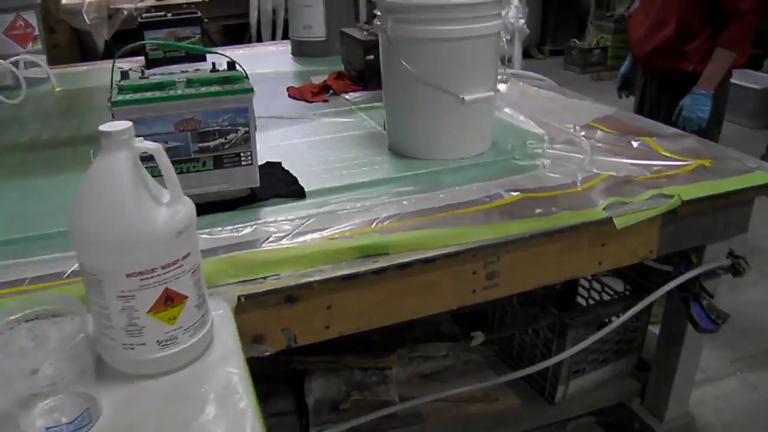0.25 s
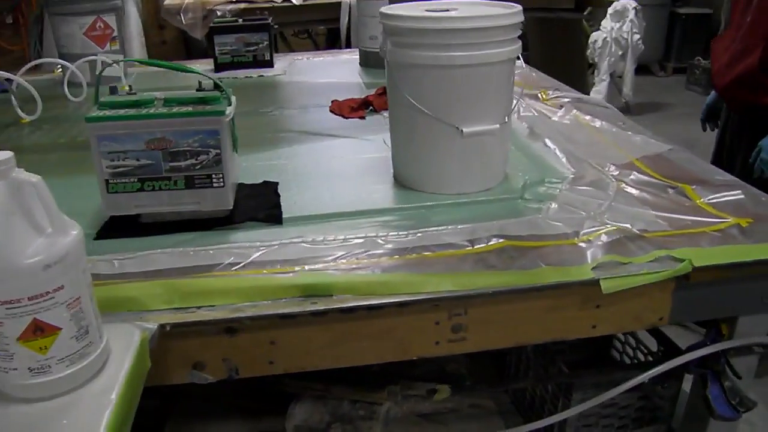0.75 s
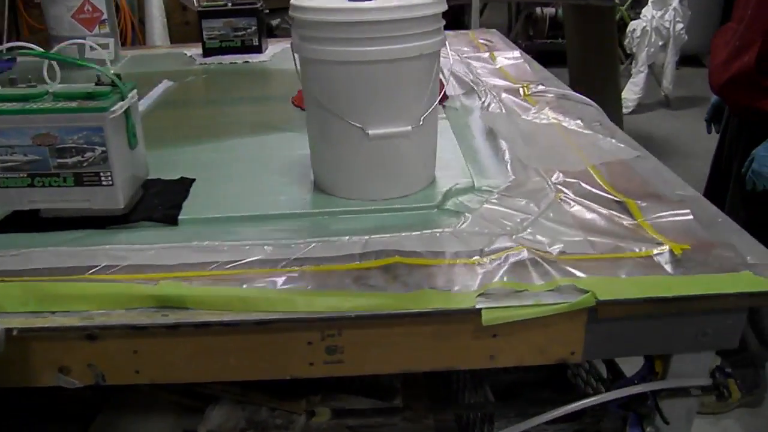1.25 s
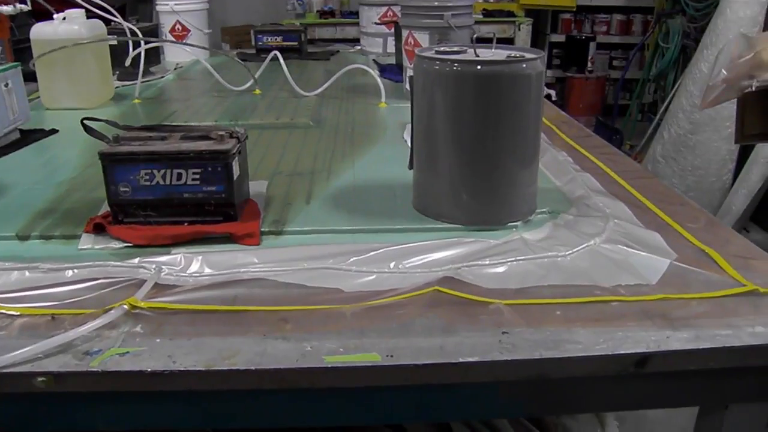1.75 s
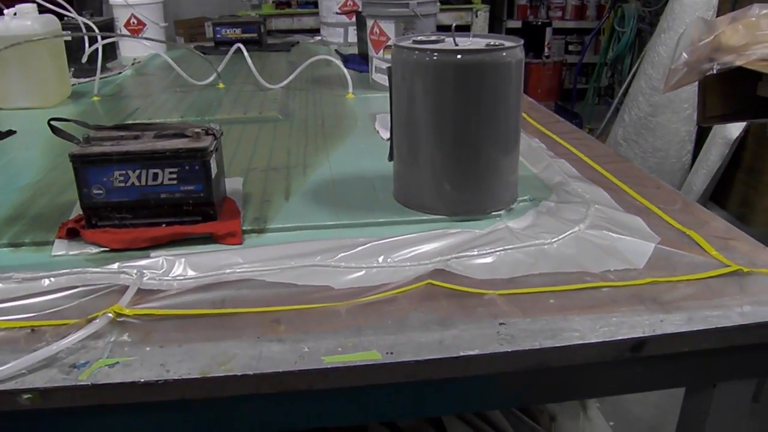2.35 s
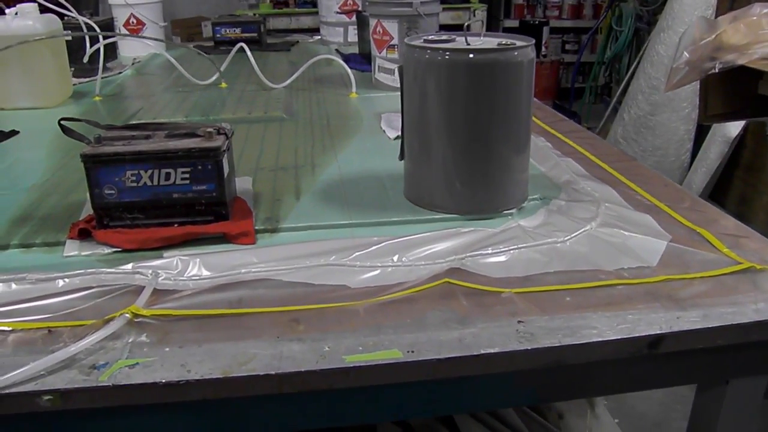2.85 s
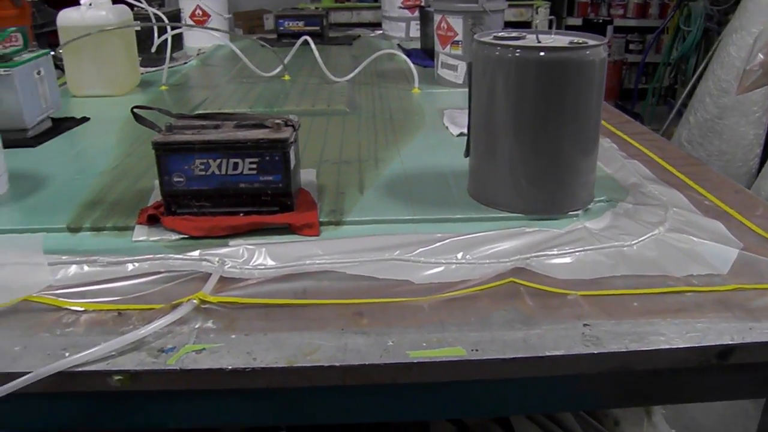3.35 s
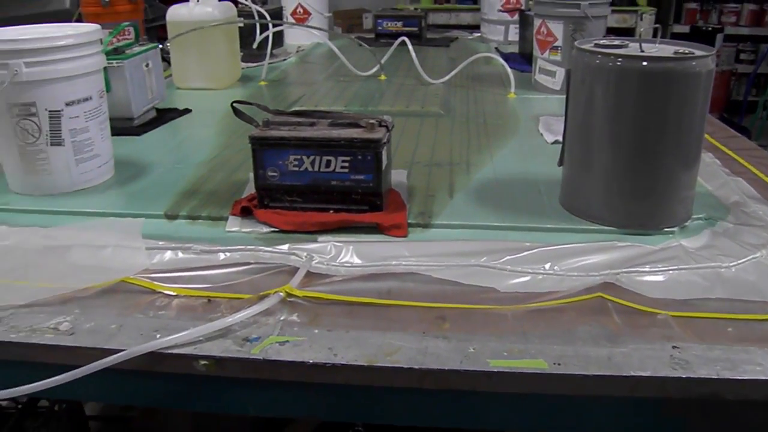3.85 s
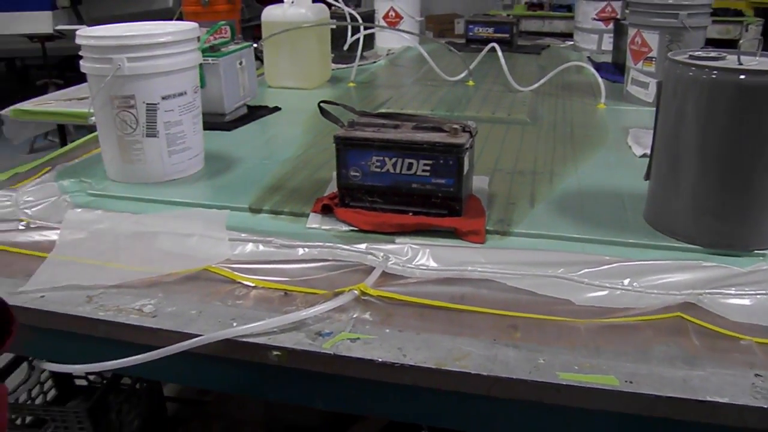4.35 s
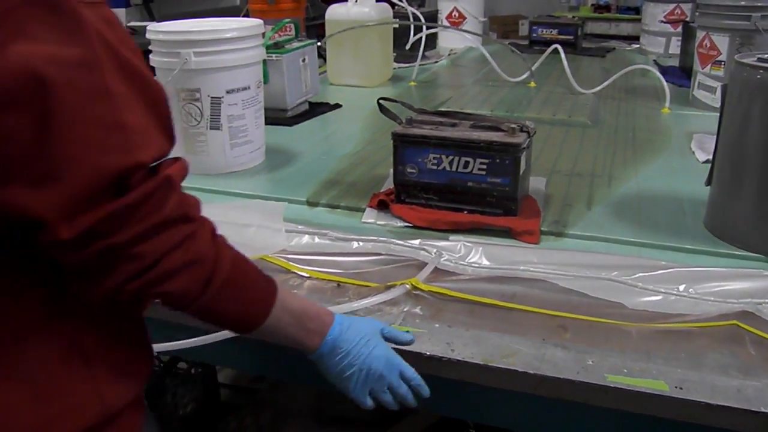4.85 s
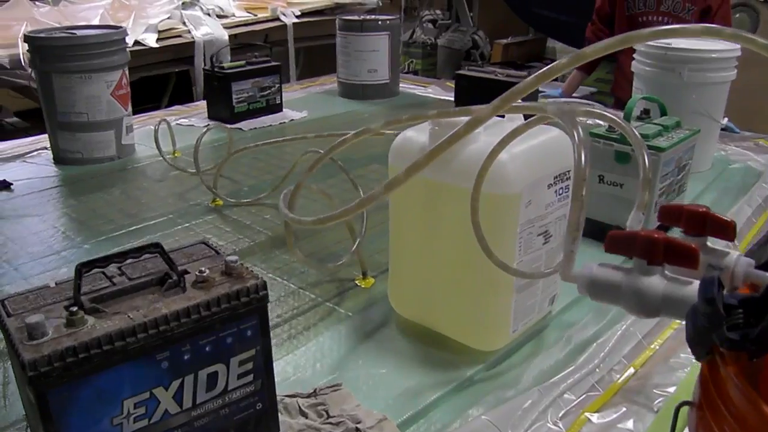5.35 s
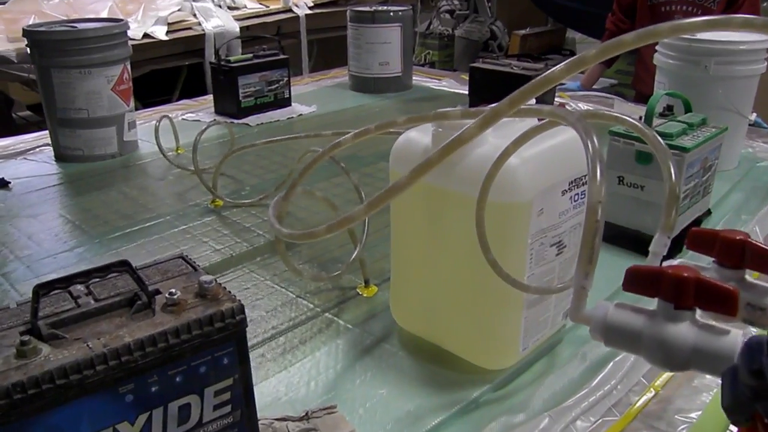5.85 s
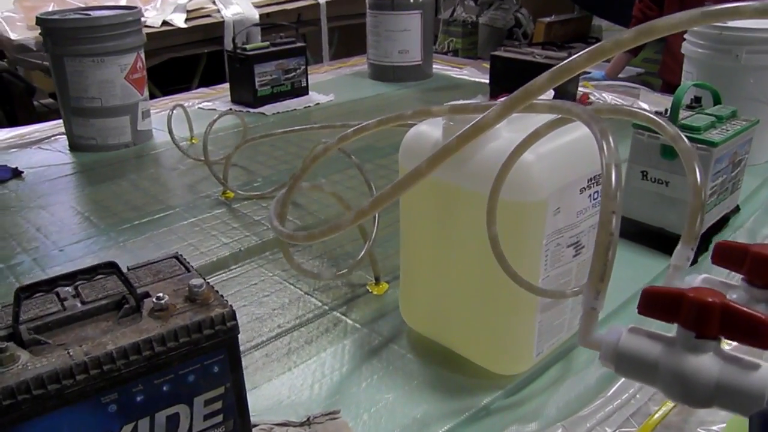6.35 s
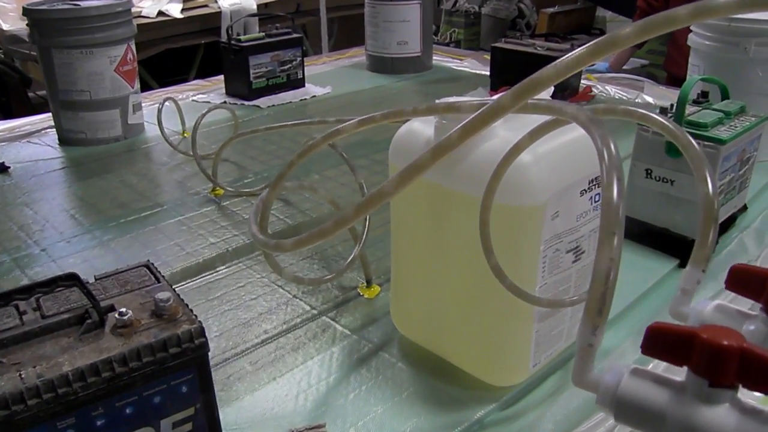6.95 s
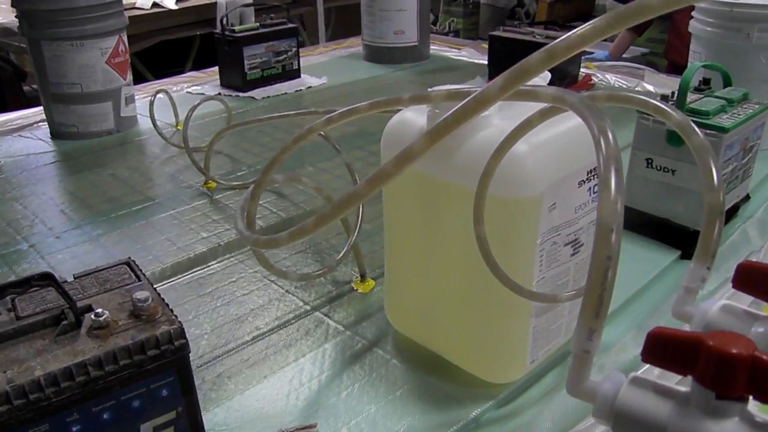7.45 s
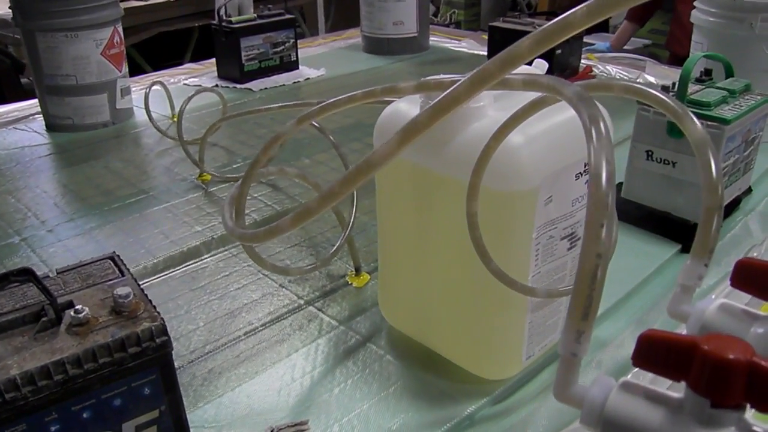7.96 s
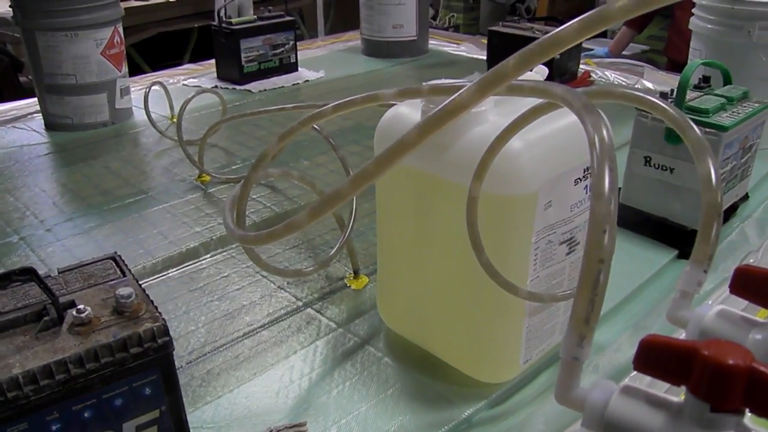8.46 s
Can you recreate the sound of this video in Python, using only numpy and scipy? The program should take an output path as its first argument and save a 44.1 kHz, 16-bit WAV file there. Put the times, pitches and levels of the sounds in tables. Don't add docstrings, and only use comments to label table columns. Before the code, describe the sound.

A vacuum pump runs without pause in a workshop: motor hum, rumbling casing, whining vanes and a piercing high hiss. Soft bumps come early. The sound cuts to a quieter, more distant spot, with a plastic film scrape, a sharp dry tick and a later faint bump and scrape. After a very short gap it returns bright and close, with two softer ticks and a faint hose squeak. One mono microphone.

```python
import sys
import numpy as np
from scipy import signal
from scipy.fft import rfft, irfft, next_fast_len
from scipy.io import wavfile
from scipy.ndimage import uniform_filter1d, map_coordinates

SR = 44100
rng = np.random.default_rng(int(sys.argv[2]) if len(sys.argv) > 2 else 0)


def pcm_store(signal):
    levels = np.round(np.clip(np.atleast_2d(signal), -1, 1) * 32767)
    wavfile.write(sys.argv[1], SR, levels.astype(np.int16).T)


def volts_from_decibels(level):
    exponent = np.asarray(level, float) / 20
    return 10 ** exponent


N = 383669
MAINS_HZ = 60.03

# (start [s], end [s], fade-in [s], fade-out [s], shaft speed [turns/s])
SPOTS = [
    (-.1, 1.537, .01, .02, 28.47),
    (1.517, 5.044, .02, .0005, 28.483),
    (5.0855, 8.8, .011, .01, 28.43),
]


def unit(x):
    return x / np.sqrt(np.mean(x ** 2) + 1e-20)


def along(points, hz):
    f, level_db = np.transpose(points)
    return np.interp(np.log(hz + 1), np.log(f + 1), level_db, left=-120, right=-120)


def filtered(x, response):
    m = next_fast_len(len(x) + 8192)
    spectrum = rfft(x, m) * response(np.fft.rfftfreq(m, 1 / SR))
    return irfft(spectrum, m)[:len(x)]


def wobble(n, rate):
    knots = rng.standard_normal(int(n * rate / SR) + 2)
    return np.interp(np.arange(n) * rate / SR, np.arange(len(knots)), knots)


def tones(t, lines, wander_db, rate):
    knots = np.arange(int(t[-1] * rate) + 2) / rate

    def reach(hz):
        return min(hz / 2000, 1) * rng.standard_normal(len(knots))

    total = 0
    for hz, db in lines:
        strength = np.interp(t, knots, np.sqrt(2) * volts_from_decibels(db + wander_db * reach(hz)))
        phase = np.interp(t, knots, 1.2 * reach(hz) + rng.uniform(0, 2 * np.pi))
        total = total + strength * np.sin(2 * np.pi * hz * t + phase)
    return total


def stroke(start, rise, length, db):
    sag_db_per_s, release_s = 87, .011
    u = np.arange(N) / SR - start
    ramps = np.clip(np.minimum(u / rise, (length - u) / release_s), 0, 1)
    return volts_from_decibels(db - sag_db_per_s * np.clip(u - rise, 0, 1)) * ramps


def patchy(n, depth_db, ripple_db):
    z = signal.stft(rng.standard_normal(n + 512), nperseg=512)[2]

    def field(high, long):
        smooth = uniform_filter1d(rng.standard_normal(z.shape), high, 0)
        return unit(uniform_filter1d(smooth, long, 1))

    gain = volts_from_decibels(depth_db * field(4, 12) + ripple_db * field(1, 200))
    return signal.istft(z * gain, nperseg=512)[1][:n]


def turn_pattern(t, shaft_hz, vane_db, drift):
    knots = int(t[-1] * 3) + 3
    orders = np.arange(int(15700 / shaft_hz))

    def draw(*shape):
        return rng.standard_normal(shape) + 1j * rng.standard_normal(shape)

    lines = draw(len(orders)) + drift * draw(knots, len(orders))
    turns = irfft(lines * volts_from_decibels(vane_db * (orders % 4 == 0)), 8192)
    turns = np.c_[turns, turns[:, :1]]
    return unit(map_coordinates(turns, [t * 3, t * shaft_hz % 1 * 8192], order=1))


def steady(spot):
    orders = [4, 18, 20, 21, 24, 24.5, 25, 29, 30, 31, 36, 44, 48, 52, 69, 70, 73, 80, 81, 82, 88, 96]
    order_db = [
        [-67, -53, None, -51, -51, -47.5, -57, -47, -46, -45, None, -39, -46, None, None, -32.5, None, None,
         None, None, -36, None],
        [None, None, -57.5, None, -54.5, None, None, -54, None, -56, None, None, -52, -50, None, -49, None, -46,
         -42, None, -50, -50],
        [-59, None, -54.5, -48, -49, -45.5, None, -42.5, -59.5, -45.5, -52, -53, None, None, -46, None, -49,
         None, None, -45, -47, None],
    ]
    multiples = [1, 3, 5, 8, 9, 11, 12, 13, 14]
    mains_db = [
        [None, -50, None, -46, -50, -46, -57, -55, None],
        [-63, -47.5, -49.5, -50, -53, -47, -45, -59, -43],
        [None, -59, None, None, -67, None, None, None, None],
    ]
    # (frequency [Hz], level [dB rms])
    slots = [
        [(1856.2, -34.5), (2046.3, -47)],
        [(1981.7, -47), (2557.4, -43), (2569.9, -46)],
        [(1446.8, -56), (1614.3, -49), (1636.5, -54), (1841.4, -45), (1869.4, -44.5), (1984.8, -47),
         (2366.0, -48)],
    ]
    hz = [k * SPOTS[spot][-1] for k in orders] + [2 * k * MAINS_HZ for k in multiples]
    levels = order_db[spot] + mains_db[spot]
    return [(f, db) for f, db in zip(hz, levels) if db is not None] + slots[spot]


def pump(t, spot, off_db):
    # (frequency [Hz], level [dB rms])
    whine_lines = [
        [(3506.2, -45), (3928.1, -48), (4468.8, -51), (4553.6, -46), (4752.4, -48), (4781.4, -47),
         (5122.5, -53), (5208.7, -55), (5351.7, -67), (8427.2, -50), (8769.1, -44), (8877.7, -40),
         (8891.9, -43), (8992.8, -30), (9116.3, -42), (9224.3, -39)],
        [(3246.8, -62), (3645.8, -63), (4471.8, -55.5), (5212.0, -56), (5240.6, -56), (5354.7, -59),
         (5469.1, -65), (5724.8, -56), (7007.0, -63), (7434.0, -60), (8203.1, -53), (8431.3, -52),
         (8773.1, -54), (8887.2, -47), (9001.9, -48), (9228.3, -47)],
        [(3503.9, -49.5), (4548.2, -46), (4776.3, -48), (5088.2, -45), (5116.8, -44), (5344.3, -48),
         (5913.4, -37), (6708.9, -47), (7306.1, -39), (8045.7, -49), (8414.8, -39), (8641.9, -46),
         (8869.7, -38), (8898.3, -52), (9210.5, -46), (10574.1, -51)],
    ]
    # (frequency [Hz], level [dB per Hz])
    casing_colour = [
        [(22, -29), (110, -28), (250, -20), (450, -17), (800, -12), (1150, -15.5), (1500, -6.5), (1700, -6.5),
         (1900, 0), (2300, -1.5), (2800, -2.5), (3050, -11.5), (3400, -10.5), (3800, -18)],
        [(22, -33), (110, -25.5), (250, -12.5), (450, -14.5), (800, -7.5), (1150, -14), (1500, -8),
         (1700, -2.5), (1900, -0.5), (2300, -4), (2800, -5.5), (3050, -13.5), (3400, -8.5), (3800, -15)],
        [(22, -20), (110, -19.5), (250, -12.5), (450, -6), (800, -3), (1150, -7), (1500, -3), (1700, -3.5),
         (1900, 0.5), (2300, -1), (2800, -2.5), (3050, -10), (3400, -6.5), (3800, -12)],
    ]
    # (frequency [Hz], level [dB per Hz])
    air_colour = [
        [(2240, -46), (3800, -22), (4250, -14.5), (4620, -16.5), (5520, -15), (5620, -21), (6000, -13),
         (6440, -19.5), (6960, -14.5), (7660, -15.5), (8990, 1), (9480, 0), (11300, -10.5), (14100, -5.5),
         (15700, -10)],
        [(2240, -33), (3800, -9.5), (4300, -11.5), (4930, -6.5), (5460, -10.5), (5860, -7.5), (6440, -10),
         (7210, -8.5), (7840, -12.5), (9040, -3.5), (10800, -8.5), (11700, -9), (12800, -11.5), (14700, -12),
         (15700, -12)],
        [(2240, -47), (3800, -22), (4360, -18), (4930, -11.5), (5590, -14), (5830, -8.5), (6440, -10),
         (7170, -7), (7700, -12.5), (8880, 2), (9420, -1), (10900, -9), (12300, -10.5), (14500, -7),
         (15700, -12)],
    ]
    # (casing [dB], air [dB], part that repeats every turn [dB], tone wander [dB])
    mix = [
        (-20, -12.5, -5.5, 4.5),
        (-29, -30.5, -4, 2),
        (-30.5, -14.5, -5.5, 2),
    ]
    # (frequency [Hz], width [Hz], boost at spot 1, 2, 3 [dB])
    head_rings = [(2767, 30, 5.5, 4.2, 4.7), (4850, 55, 4.5, 2, 2.1), (5920, 40, 1, 3, 6),
                  (8470, 56, 3, 3, 4.3), (8830, 36, 8.5, 3.1, 3.2), (9160, 39, 3, 4.2, 3.6),
                  (9210, 31, 7, 6, 6), (9540, 61, 1, 1, 4), (9720, 60, 4, 4.1, 3), (10330, 74, 6.5, 2, 2.2),
                  (11440, 110, 5, 4, 2.8), (14700, 110, 2, 1, 9.4)]
    # (whine, head ringing, topmost hiss [all dB per dB of aim])
    beam = [
        (.3, .2, .1),
        (.1, .1, .1),
        (0.76, .4, 0.89),
    ]
    casing_db, air_db, repeat_db, wander_db = mix[spot]
    shaft_hz = SPOTS[spot][-1]
    whine, ringing, top = (volts_from_decibels(share * off_db) for share in beam[spot])

    turn = 2 * np.pi * shaft_hz * t
    chop = 1 + 0.08 * np.sin(turn) + 0.077 * np.sin(4 * turn) + 0.077 * np.sin(8 * turn + 1)
    chop = chop + 0.046 * np.sin(4 * np.pi * MAINS_HZ * t)

    def repeat(db):
        return volts_from_decibels(db) * turn_pattern(t, shaft_hz, vane_db=6.5, drift=0.41)

    casing = chop * patchy(len(t), depth_db=0.94, ripple_db=1.5) + repeat(repeat_db - 6.5)
    casing = unit(filtered(casing, lambda hz: volts_from_decibels(along(casing_colour[spot], hz))))
    air = chop * patchy(len(t), depth_db=1.0, ripple_db=3) + whine * repeat(repeat_db)
    air = unit(filtered(air, lambda hz: volts_from_decibels(along(air_colour[spot], hz))))
    air = air + (top / top.mean() - 1) * filtered(air, lambda hz: hz > 13400)
    noise = volts_from_decibels(casing_db) * casing + volts_from_decibels(air_db) * air

    def head(hz):
        return volts_from_decibels(sum(db[spot] / (1 + ((hz - centre) / width) ** 2) for centre, width, *db in head_rings))

    hum = tones(t, steady(spot), wander_db, rate=2.97)
    vanes = whine * tones(t, whine_lines[spot], wander_db + 2.5, rate=5.96)
    return noise + ringing * (filtered(noise, head) - noise) + hum + vanes


def swells(s, spot):
    clean_orders = [8, 12, 16, 27, 28, 78]
    # (order 66 [dB], rotor slot tone [dB])
    pair_db = [
        (3.5, -1.5),
        (2.5, -5.5),
        (-0.5, 0),
    ]
    # (level at start [dB], at end [dB])
    drift_db = [
        [(-43, -41.5), (-46, -41), (-41.5, -42), (-49, -38), (-35.5, -36), (-39, -38), (-34, -31)],
        [(-51, -56.5), (-41, -40.5), (-52, -52), (-48.5, -46.5), (-45.5, -43), (-47, -49), (-37.5, -39)],
        [(-46.5, -50.5), (-44, -48), (-47, -49), (-44, -40), (-38, -35.5), (-37.5, -57), (-41, -38.5)],
    ]
    # (time [s], half width [s], change [dB])
    all_nodes = [
        [(1.75, .2, 3)],
        [(.56, .2, -11)],
        [(.36, 0.21, 5), (.85, .16, -6), (3.2, 0.89, -6)],
        [(.45, 0.18, -10)],
        [(.5, 0.35, -6.5), (1.02, .15, 2), (4.85, 0.32, -13)],
        [(.5, .15, 5), (3, 0.46, 3)],
        [(5.62, 0.36, -16)],
    ]
    shaft_hz = SPOTS[spot][-1]
    t = s - s[0]
    waves = []
    for k, lift_db in zip(clean_orders, [.1, .1, .1, .1, 2.9, .1]):
        waves.append(tones(t, [(k * shaft_hz, lift_db)], 0.74, rate=3.95))
    pair_hz = 66 * shaft_hz, 62 * shaft_hz + 2 * MAINS_HZ
    waves.append(tones(t, zip(pair_hz, pair_db[spot]), .8, rate=2.505))

    total = 0
    for ends, nodes, wave in zip(drift_db[spot], all_nodes, waves):
        level_db = np.linspace(*ends, len(s))
        for at, width, db in nodes:
            level_db = level_db + db * np.exp(-((s - at) / width) ** 4)
        total = total + volts_from_decibels(level_db) * wave
    return total


def heard(spot):
    borders = [1400, 3800, 7900]
    # (time [s], gain towards the outlet [dB])
    aim = [(0, 3), (.27, 3.5), (.5, 1), (.7, -0.5), (1.1, 0.8), (1.5, -0.5), (1.8, 0.5), (2.1, -0.2),
           (5.04, -0.1), (5.1, 4), (5.25, 5.5), (5.75, 4), (6.3, 3), (6.85, 2), (7.3, 0.8), (8.25, 0.3),
           (8.7, 0)]
    # (hum, casing, hiss, whistle [all dB])
    rest_db = [
        (-32, -21.5, -30.5, -21.8),
        (-37, -30, -35, -30.5),
        (-34.5, -33, -27, -21),
    ]
    # (hum, casing, hiss, whistle [all dB per dB])
    follows = [
        (0.064, .25, 0.17, 1.1),
        (.4, 1.2, -0.46, 0.91),
        (-0.019, 0.51, 0.87, .6),
    ]
    start, end, fade_in, fade_out, _ = SPOTS[spot]
    first = max(round(start * SR), 0)
    s = np.arange(first, min(round(end * SR), N)) / SR
    aim_db = np.interp(s, *np.transpose(aim))
    source = pump(s - s[0], spot, aim_db - aim_db.max())

    x = swells(s, spot)
    edges = [0, *borders, SR]
    for lo, hi, db, share in zip(edges, edges[1:], rest_db[spot], follows[spot]):
        band = unit(filtered(source, lambda hz: (hz >= lo) & (hz < hi)))
        x = x + volts_from_decibels(db + share * aim_db) * band
    fade = np.clip(np.minimum((s - start) / fade_in, (end - s) / fade_out), 0, 1) ** 0.89
    return np.pad(x * fade, (first, N - first - len(s)))


def bumps():
    # (time [s], peak [dB], pitch [Hz])
    knocks = [
        (0.32, -22, 466),
        (0.357, -20.5, 330),
        (.358, -19, 1140),
        (4.665, -28, 720),
    ]
    out, t = np.zeros(N), np.arange(1300) / SR
    for at, db, hz in knocks:
        ring = volts_from_decibels(db - 60 * t / 0.044) * np.sin(2 * np.pi * hz * t)
        out[round(at * SR):][:len(t)] += ring * (1 - np.exp(-t / .002))
    return out


def film():
    # (start [s], rise [s], length [s], level [dB])
    scrapes = [
        (1.648, .002, 0.032, -16.5),
        (1.665, 0.023, 0.118, -16),
        (4.722, .032, .068, -22),
    ]
    # (frequency [Hz], level [dB per Hz])
    film_colour = [(650, -46), (1100, -23), (1760, -9), (2120, -9), (2810, -6), (3100, -7.5), (3410, -5.5),
                   (3710, -10), (7000, -26.5), (9100, -54), (15400, -120)]
    grains = rng.standard_normal(N) * volts_from_decibels(1.7 * wobble(N, 900) + 0.67 * wobble(N, 90))
    grains = unit(filtered(grains, lambda hz: volts_from_decibels(along(film_colour, hz))))
    return grains * sum(stroke(*row) for row in scrapes)


def ticks():
    # (time [s], peak [dB])
    taps = [
        (3.3365, .5),
        (6.838, -3),
        (7.92, -7),
    ]
    out, t = np.zeros(N), np.arange(1300) / SR
    for at, db in taps:
        burst = volts_from_decibels(db - 9 - 60 * t / 0.014) * rng.standard_normal(len(t))
        click = volts_from_decibels(db - 1.5) * (t == 0)
        out[round(at * SR):][:len(t)] += burst + click
    colour = [(1200, -20), (2200, 0), (4000, -2.5), (7000, -4), (15000, -9)]  # (Hz, dB)
    return filtered(out, lambda hz: volts_from_decibels(along(colour, hz)))


def squeak():
    # start [s], rise [s], length [s], level [dB]
    hose_stroke = (8.315, .03, .17, -31)
    # (frequency [Hz], level [dB per Hz])
    rub_colour = [(2000, -20), (3000, -14), (3950, -22), (4100, -6), (4190, -5), (4350, -20), (6000, -28)]
    rub = unit(filtered(rng.standard_normal(N), lambda hz: volts_from_decibels(along(rub_colour, hz))))
    return stroke(*hose_stroke) * rub


def scene():
    pump_sound = heard(0) + heard(1) + heard(2)
    return np.tile(pump_sound + bumps() + film() + ticks() + squeak(), (2, 1))


def band_limit(x):
    return signal.sosfilt(signal.butter(12, 16820, fs=SR, output="sos"), x)


def record(dry):
    # width [Hz], depth [0-1]
    notch = (88, 0.81)
    width_hz, depth = notch

    def microphone(hz):
        dip = 1 - np.clip(depth, 0, 1) * np.exp(-((hz - 7870) / width_hz) ** 2)
        return dip * np.clip((15760 - hz) / 80, 0, 1) ** 2

    return band_limit(np.tile(filtered(dry[0], microphone), (2, 1)))


dry = scene()
out = record(dry)
pcm_store(out)
```